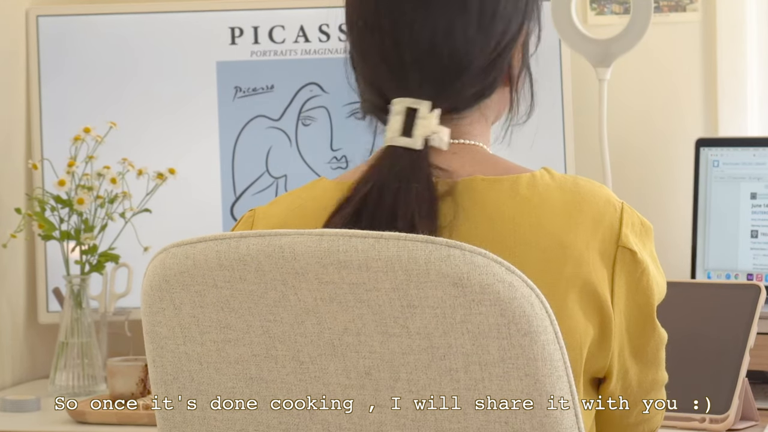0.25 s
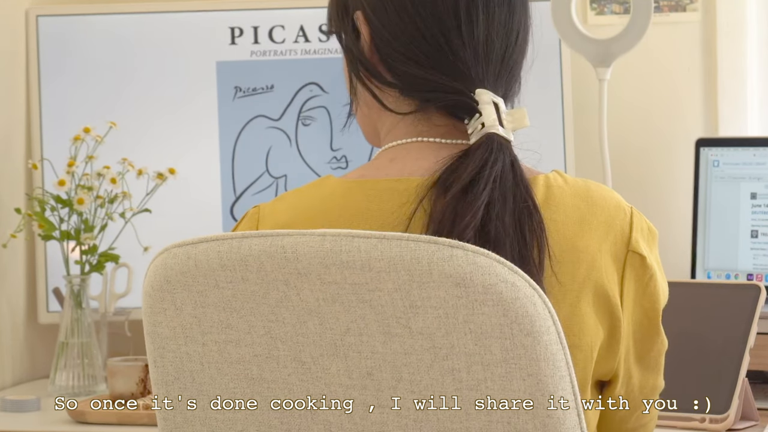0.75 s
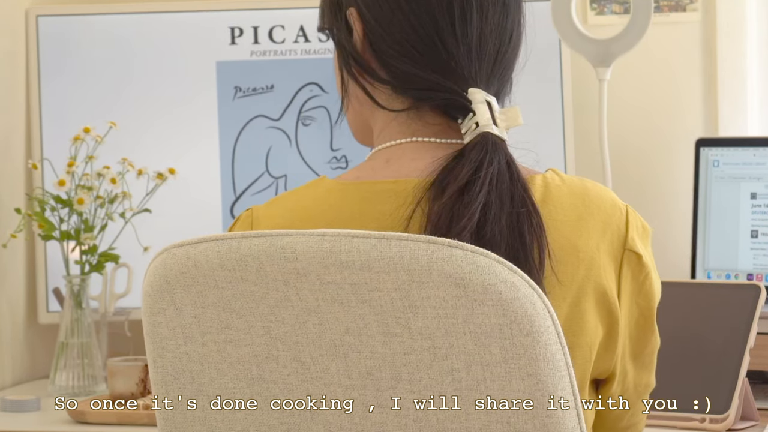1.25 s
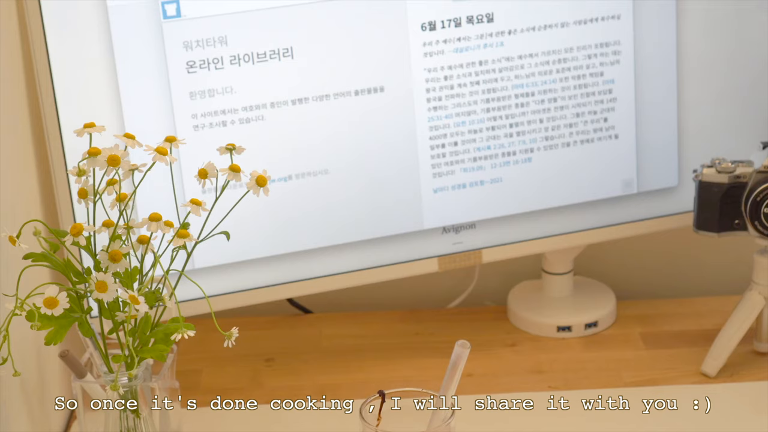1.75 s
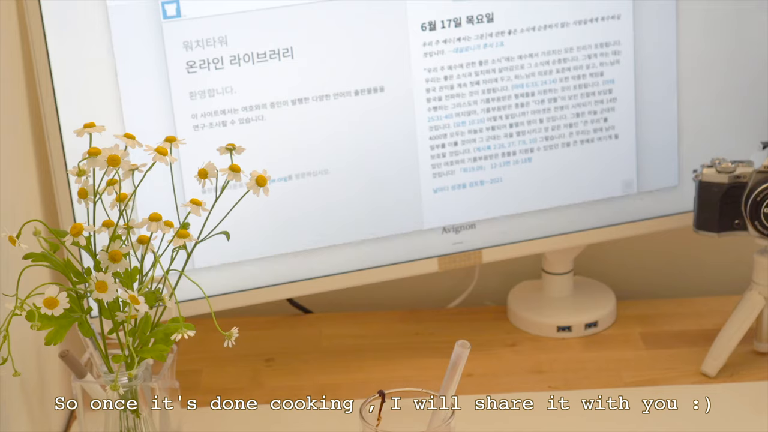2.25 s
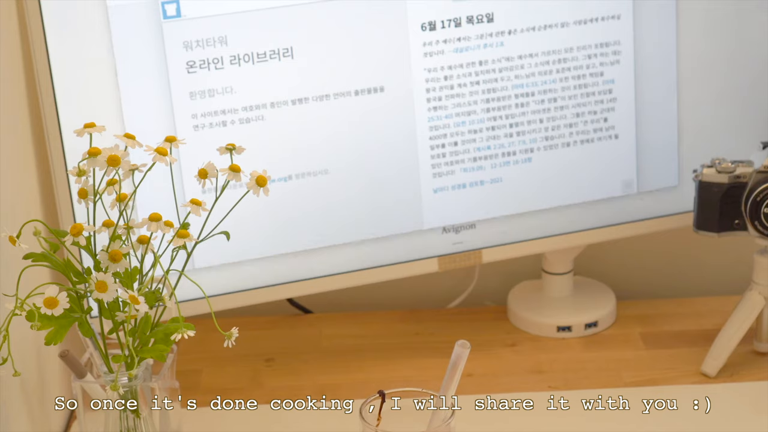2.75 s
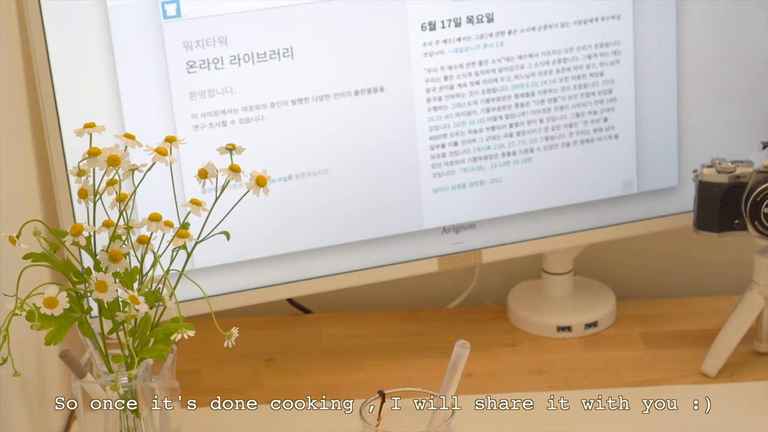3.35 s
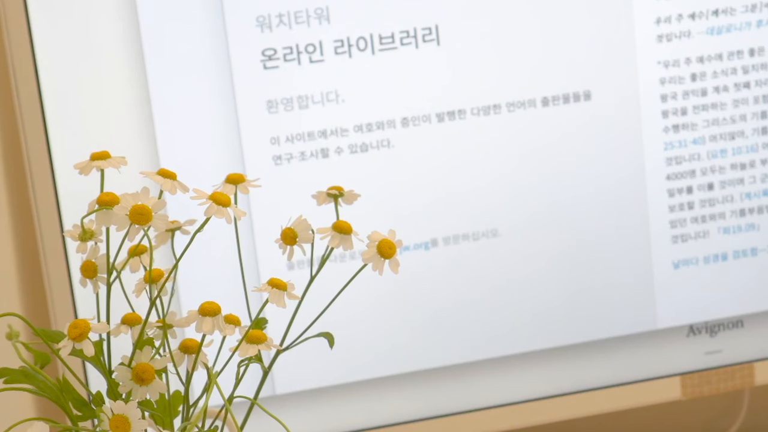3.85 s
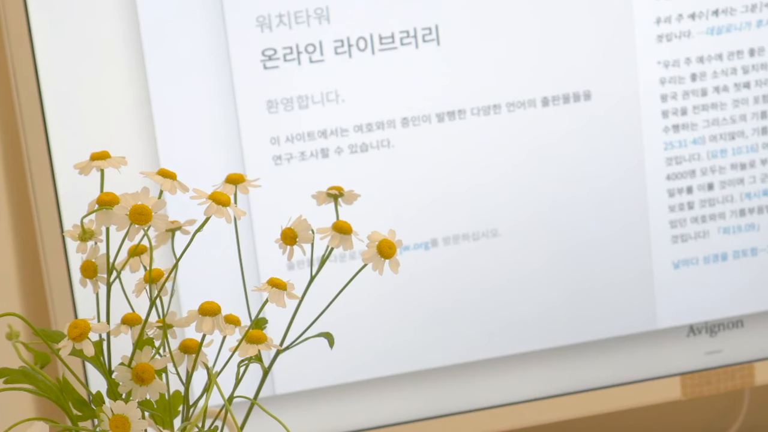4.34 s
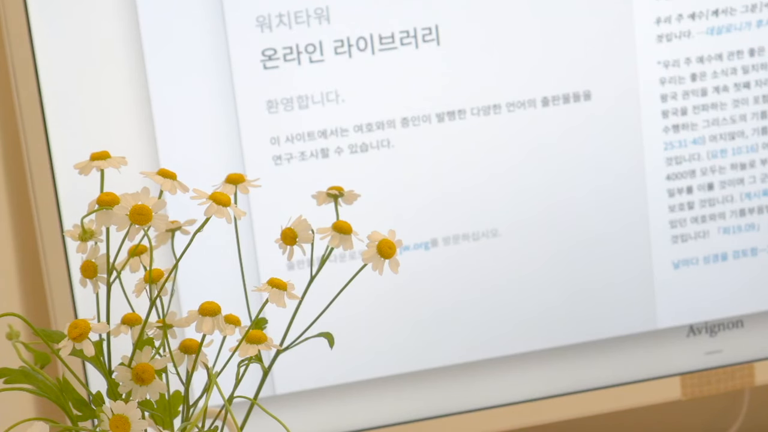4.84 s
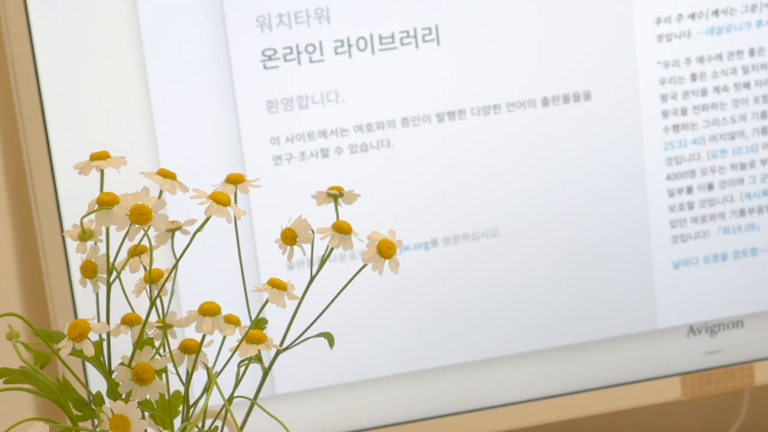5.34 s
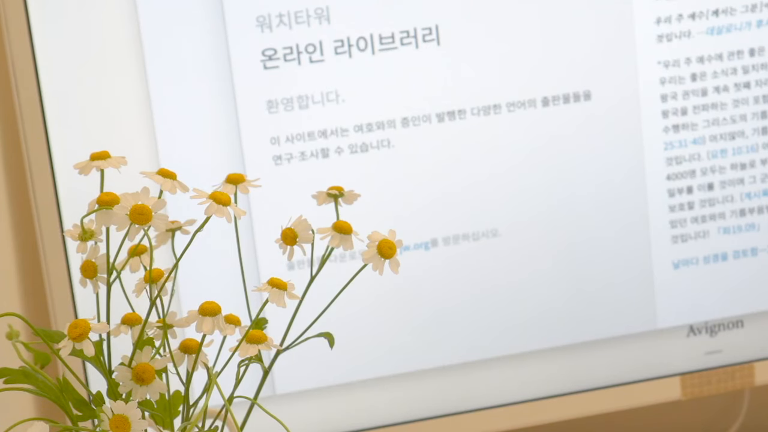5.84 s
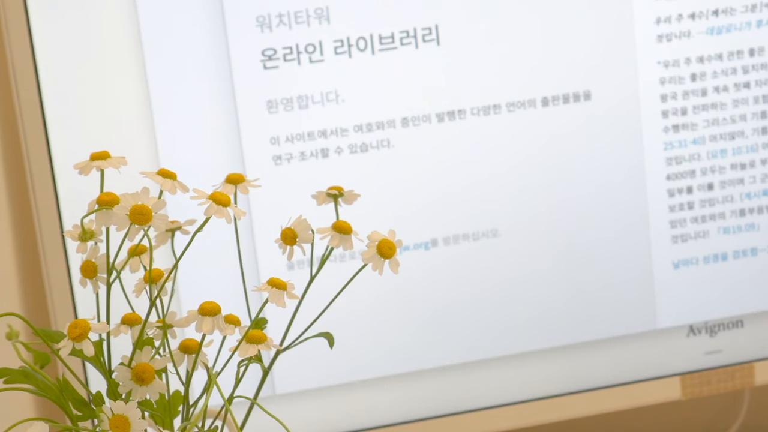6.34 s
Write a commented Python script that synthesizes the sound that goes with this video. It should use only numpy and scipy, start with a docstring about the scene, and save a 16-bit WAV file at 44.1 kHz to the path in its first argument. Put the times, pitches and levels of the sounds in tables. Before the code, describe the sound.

From the start, a glass straw stirs a drink in a small, echoing room, heard from a little way off. It scrapes and clinks brightly against the glass, with small liquid plops, over ventilation noise and a low rumble. The clinks are strongest in the first second, then lighter.

At about 1.5 seconds the sound switches suddenly to a quieter desk, where a fan hums and whirrs softly to the end. A computer mouse gives thin press-and-release clicks at about 2.1 and 3.1 seconds. A hand slides very faintly over the desk now and then. Something knocks on the wood with a slight rattle at 3.9 seconds, then louder at 4.6, followed by a small tap. The mouse clicks again at 5 seconds and between 6.1 and 6.3, joined by light fingertip taps. A last faint hand rub comes around 6.5 seconds.

```python
"""A small, echoing room, heard from a little way off. Behind a seated person a glass straw stirs a drink:
it scrapes and clinks on the glass, and pockets of air plop, over ventilation noise and a low rumble.
Then the scene switches to quieter work at a wooden desk. A fan hums and whirrs, a hand slides about,
the springy switch of a computer mouse clicks, and something knocks on the desk."""
import sys
import numpy as np
from scipy import signal
from scipy.fft import rfft, irfft
from scipy.io import wavfile

SR = 44100
rng = np.random.default_rng(int(sys.argv[2]) if len(sys.argv) > 2 else 0)


def dump(signal):
    """Clip the signal to [-1, 1] and save it as 16-bit WAV at the path in sys.argv[1]."""
    limited = np.clip(np.atleast_2d(signal).T, -1, 1)
    pcm = np.round(limited * 32767).astype(np.int16)
    wavfile.write(sys.argv[1], SR, pcm)


N = 290619


def amp(db):
    return 10 ** (np.asarray(db) / 20)


def unit_level(x):
    return x / np.sqrt(np.mean(x ** 2) + 1e-20)


def curve_at(points, hz):
    point_hz, value = np.transpose(points)
    return np.interp(np.log(hz + 1), np.log(point_hz), value)


def add(mix, start_s, sound):
    part = mix[..., max(round(start_s * SR), 0):][..., :sound.shape[-1]]
    part += sound[..., :part.shape[-1]]


def ring(tones, pitch=1, tilt_db=0, size=4096):
    """An object rings after one hit. Wider tones die sooner; tilt_db adds treble per octave."""
    hz = np.fft.rfftfreq(size, 1 / SR)
    power = 0
    for tone_hz, width_hz, db in tones:
        peak = amp(db + tilt_db * np.log2(tone_hz / tones[0][0]))
        power += (peak / (1 + (2 * (hz - tone_hz * pitch) / width_hz) ** 2)) ** 2
    # turn the spectrum into a sound that starts at once and then fades
    cepstrum = irfft(np.log(power + 1e-12) / 2)
    cepstrum[1:size // 2] *= 2
    cepstrum[size // 2 + 1:] = 0
    return unit_level(irfft(np.exp(rfft(cepstrum)))) / np.sqrt(size)


def stereo(spectra, likeness, hz):
    """Blends two noises into left and right: likeness 1 is identical, 0 is unrelated."""
    same = np.clip(curve_at(likeness, hz), -1, 1)
    mid = spectra[0] * np.sqrt((1 + same) / 2)
    side = spectra[1] * np.sqrt((1 - same) / 2)
    return np.array([mid + side, mid - side])


# first paths from the glass, the straight one shaded by the person: delay_s, left_db, right_db
GLASS_PATHS = [(0, -21, -22), (.0048, -10.5, -12), (.0062, -18, -15), (.0077, -8, -13), (0.011, -17, -12.5)]
# first paths from the desk: delay_s, left_db, right_db
DESK_PATHS = [(0, -23.5, -18), (.0017, -12, -15.5), (.0032, -23, -20), (.0058, -13, -9), (.0075, -27, -35),
              (0.018, -26, -39)]
# time the echo takes to fade by 60 dB: pitch_hz, fade_s
ECHO_FADE = [(150, 0.4), (500, 0.48), (1500, 0.48), (5500, 0.45), (9000, 0.38), (15000, 0.3)]
# how alike the echo is left and right: pitch_hz, likeness
ECHO_LIKENESS = [(100, 1), (500, 0.99), (1500, 0.75), (3000, 0.34), (6000, 0.1), (14000, 0.109)]
def room(sound, paths, tail_db, build_s, left_db):
    """Sound arrives by a few short paths, then as a wash of echoes whose treble dies first."""
    hz, t, noise = signal.stft(rng.standard_normal((2, SR // 2)), SR, nperseg=256)
    fade = amp(-60 * t[:, None] / curve_at(ECHO_FADE, hz))
    spectra = stereo(noise.transpose(0, 2, 1), ECHO_LIKENESS, hz) * fade
    tail = signal.istft(spectra.transpose(0, 2, 1), SR, nperseg=256)[1]
    tail *= np.clip(np.arange(tail.shape[1]) / SR / build_s, 0, 1) ** 2
    echo = amp(tail_db) * tail / np.linalg.norm(tail[0])
    for delay_s, left, right in paths:
        add(echo, delay_s, amp([[left], [right]]))
    balance = amp([[left_db], [-left_db]])
    return signal.fftconvolve(sound[None], echo * balance, axes=1)[:, :N]


# tone of the air around the drink: pitch_hz, relative_db
DRINK_AIR = [(20, -11), (40, -14), (58, 4.5), (85, -1.5), (130, -5), (200, -8.5), (350, -9), (600, -7),
             (900, -16), (2000, -16), (5000, -31), (16000, -37.5)]
# tone of the air around the desk: pitch_hz, relative_db
DESK_AIR = [(12, -46), (20, -13.5), (65, -7), (93, -9.5), (123, 1.5), (158, -9.5), (270, -5), (410, -9),
            (660, -14), (780, -16.5), (949, -15.5), (1610, -22), (2530, -23.5), (3340, -27.5), (16000, -35)]
# how alike the air is left and right: pitch_hz, likeness
AIR_LIKENESS = [(60, 1), (150, 0.9), (380, 0.72), (950, 0.22), (2380, 0.069), (5980, 0.15), (15000, 0.2)]
def air(colour, db):
    """Steady ventilation noise, with nearly the same bass in both ears."""
    hz = np.fft.rfftfreq(N, 1 / SR)
    noise = stereo(rfft(rng.standard_normal((2, N))), AIR_LIKENESS, hz)
    return amp(db) * unit_level(irfft(noise * amp(curve_at(colour, hz)), N))


# deep tones of the rumble: pitch_hz, width_hz, relative_db
RUMBLE_TONES = [(60, 12, 5.5), (78, 30, -2.5), (125, 60, -0.5), (196, 45, 0.5), (307, 110, -9),
                (460, 240, -8)]
def rumble(quiet_db=-48.5, loud_db=-45.5, swell_at_s=0.46, rise_s=0.067):
    """A dull drone, the same in both ears, that swells once and then holds."""
    swell = np.clip((np.arange(N) / SR - swell_at_s) / rise_s, 0, 1)
    drone = signal.oaconvolve(rng.standard_normal(N + SR), ring(RUMBLE_TONES, size=32768))
    return unit_level(drone[SR:SR + N]) * amp(quiet_db + (loud_db - quiet_db) * swell)


# ringing of the drinking glass: pitch_hz, width_hz, relative_db
GLASS_TONES = [(1147, 60, 5.5), (1480, 366, -1), (2100, 680, -6.5), (2843, 330, 1.5), (3212, 420, 3),
               (4327, 670, -1.5), (5600, 600, -2), (8700, 3050, -15), (13000, 3000, -25.5)]
# rasp of the straw pressed hard: pitch_hz, width_hz, relative_db
RASP_TONES = [(1440, 1800, -4), (4400, 3500, 3), (6120, 1200, 4), (8860, 3400, -10)]
# strokes along the glass: start_s, length_s, middle_db
SCRAPES = [(-.025, 0.04, -31), (0.162, 0.43, -42.5), (0.849, .125, -34.5), (.903, 0.014, -31),
           (1.105, 0.16, -51), (1.346, .17, -41)]
def scrapes(slips_per_s=800, spread_db=7, graze_db=-54, ends_db=-5.5, rasp_from_db=-23.5):
    """Tiny slips of the straw ring the glass. Each stroke presses hardest midway, where it rasps."""
    slips = (rng.random(N) < slips_per_s / SR) * rng.choice([-1, 1], N)
    slips = slips * amp(spread_db * np.minimum(rng.exponential(1, N), 3))
    pressure = np.full(N, amp(graze_db))  # between strokes the straw barely touches
    for start_s, length_s, db in SCRAPES:
        from_middle = abs(2 * (np.arange(N) / SR - start_s) / length_s - 1)
        pressure += (from_middle < 1) * amp(db + ends_db * from_middle)
    friction = unit_level(slips) * pressure
    rasp = signal.oaconvolve(friction * pressure / amp(rasp_from_db), ring(RASP_TONES))
    scrape = signal.oaconvolve(friction, ring(GLASS_TONES)) + rasp
    return room(scrape[:N], GLASS_PATHS, tail_db=-3, build_s=0.0049, left_db=-0.5)


# plops in the drink: start_s, level_db, pitch_hz
PLOPS = [(0, -5, 1194), (0.201, -13, 1180), (0.323, -10, 1188), (0.4594, -6.5, 1160), (.722, -19, 1206),
         (0.947, -13, 1477), (1.152, -3, 1590), (1.155, -7.5, 2030), (1.208, -14, 1660), (1.271, -14, 1350),
         (1.396, -9.5, 1176)]
def plops(glass_db=-13):
    """Pockets of air in the drink ring briefly and shake the glass."""
    out = np.zeros((2, N))
    for start_s, db, hz in PLOPS:
        width_hz = 150 * (hz / 1170) ** 3  # smaller pockets ring higher and die sooner
        plop = ring([(hz, width_hz, 0)]) + amp(glass_db) * ring(GLASS_TONES)
        add(out, start_s, amp(db) * room(plop, GLASS_PATHS, tail_db=-5.5, build_s=0.0053, left_db=-0.26))
    return out


# ringing of the straw: pitch_hz, width_hz, relative_db
STRAW_TONES = [(1393, 430, -34), (2140, 1400, -33), (2997, 1400, -23.5), (3786, 500, -19), (4290, 450, -16),
               (5569, 151, 2), (5800, 410, -7.5), (6310, 300, -19), (7550, 630, -18), (8280, 530, -16.5),
               (9270, 1300, -20.5), (9980, 450, -22), (11905, 540, -26), (13600, 700, -25.5),
               (15630, 800, -42)]
# hits on the glass: start_s, level_db, pitch_factor
CLINKS = [(0.0489, 15.5, 1.014), (0.074, 9.5, 1.04), (.105, 7.5, 1.01), (0.3556, 13.5, 1.01),
          (0.5641, 11, 1.005), (0.9914, 11, 0.997), (1.3439, 0, 0.986), (1.4012, 0, 1), (1.439, -6, .985)]
def clinks(ordinary_db=10.5, tilt_per_db=0.45):
    """The straw hits the glass, brighter when harder. It moves, so each clink echoes differently."""
    out = np.zeros((2, N))
    for start_s, db, pitch in CLINKS:
        clink = amp(db) * ring(STRAW_TONES, pitch, tilt_per_db * (db - ordinary_db))
        add(out, start_s, room(clink, GLASS_PATHS, tail_db=-1, build_s=0.0038, left_db=0.44))
    return out


# strokes of the hand: start_s, length_s, level_db
SLIDES = [(1.457, 0.058, -55), (3.395, 0.16, -65), (3.922, 0.11, -64), (4.25, 0.17, -66),
          (5.676, 0.033, -65), (5.737, 0.18, -65), (6.487, 0.12, -64)]
def hand_slides(centre_hz=4500, width_hz=7000):
    """A hand rubs over the desk in soft swells of hiss."""
    friction = np.zeros(N)
    for start_s, length_s, db in SLIDES:
        swell = np.hanning(round(length_s * SR))
        add(friction, start_s, amp(db) * swell * rng.standard_normal(SR)[:len(swell)])
    hiss = signal.oaconvolve(friction, ring([(centre_hz, width_hz, 0)]))[:N]
    return room(hiss, DESK_PATHS, tail_db=3.5, build_s=0.014, left_db=0)


# notes of the fan: pitch_hz, level_db
HUM_NOTES = [(70, -65), (118.4, -69), (233, -65.5), (349.9, -70), (672.9, -72)]
# ringing of its housing: pitch_hz, width_hz, relative_db
HOUSING_TONES = [(613, 73, -2), (1416, 97, -6), (2530, 330, -12), (7950, 3000, -43)]
def fan(waver_hz=4, whirr_db=-65):
    """A fan hums with faint, wavering notes while air rushes through its housing."""
    hz = np.fft.rfftfreq(N, 1 / SR)
    hum = np.zeros(N)
    for note_hz, db in HUM_NOTES:
        narrow_band = rfft(rng.standard_normal(N)) / (1 + ((hz - note_hz) / waver_hz) ** 2)
        hum += amp(db) * unit_level(irfft(narrow_band, N))
    whirr = signal.oaconvolve(rng.standard_normal((2, N)), ring(HOUSING_TONES)[None], axes=1)
    return hum + amp(whirr_db) * whirr[:, :N]


# snap of the mouse's switch: pitch_hz, width_hz, relative_db
SNAP_TONES = [(3700, 400, 9), (6060, 4000, 8.5), (7560, 390, 6.5), (8630, 390, 8.5), (9900, 1800, 2),
              (12700, 3500, 1.5), (14700, 1500, 1.5)]
def switch(ping, landing, tilt_db, travel_s, spring_lag_s=0.001, chatter_s=0.0021, chatter_db=-1):
    """The switch snaps, chatters and rings its spring; then the button lands on the shell."""
    t = np.arange(1024) / SR
    chatter = rng.standard_normal(len(t)) * np.exp(-t / chatter_s)
    contact = amp(chatter_db) * chatter / np.linalg.norm(chatter)
    contact[0] += 1  # the snap itself
    click = np.convolve(contact / np.linalg.norm(contact), ring(SNAP_TONES, tilt_db=tilt_db))
    add(click, spring_lag_s, ping)
    add(click, travel_s, landing)
    return click


def spring(hz, width_hz=600, overtone=2.06, overtone_db=-4):
    """The switch's flat spring pings with one higher tone on top."""
    return ring([(hz, width_hz, 0), (hz * overtone, width_hz, overtone_db)])


# ringing of the mouse's shell: pitch_hz, width_hz, relative_db
SHELL_TONES = [(268, 200, 0.5), (670, 680, -3.5), (1340, 430, -9), (2130, 2300, -11.5)]
def shell(hz, width_hz=550):
    """The hollow shell rings; one tone depends on where it is hit."""
    return ring(SHELL_TONES + [(hz, width_hz, 0)])


# clicks: press_s, release_s, press_db, release_db, spring_hz, press_landing_db
CLICKS = [(2.062, 2.1897, -11, -7, 4810, -6), (3.1236, 3.2054, -13, -8.5, 4870, -7.5),
          (4.9468, 5.048, -12.5, -8.5, 4900, -19), (6.0776, 6.301, -12.5, -13, 5290, -15)]
def mouse_clicks():
    """The button goes down with a thin snap and comes up with a brighter ring."""
    out = np.zeros((2, N))
    for press_s, release_s, press_db, release_db, hz, landing_db in CLICKS:
        loaded_ping = amp(-5) * spring(hz * 0.95)  # a pressed spring rings lower and weaker
        landing = amp(landing_db - press_db) * shell(hz=1620)
        press = switch(loaded_ping, landing, tilt_db=6.5, travel_s=0.0069)
        release = switch(amp(1) * spring(hz), amp(-10) * shell(hz=1350), tilt_db=1.5, travel_s=0.00193)
        for start_s, db, click in (press_s, press_db, press), (release_s, release_db, release):
            add(out, start_s, amp(db) * room(click, DESK_PATHS, tail_db=-5, build_s=0.0025, left_db=0.3))
    return out


# boom of the desk's board: pitch_hz, width_hz, relative_db
THUD_TONES = [(143, 70, -10), (230.4, 68, 5.5), (346, 350, -3), (596, 62, -0.5), (700, 230, -7.5)]
# clack of its surface: pitch_hz, width_hz, relative_db
CLACK_TONES = [(890, 730, 0), (1760, 1300, 8), (2470, 820, 5.5), (3550, 1900, 1.5), (5000, 2000, 1),
               (7600, 4600, -7.5), (12800, 4000, -15)]
# rattle of things on it: pitch_hz, width_hz, relative_db
RATTLE_TONES = [(1270, 190, -5), (1380, 180, 18.5), (2000, 790, 2)]
# knocks: start_s, thud_db, hardness_db_per_octave, clack_db, rattle_db
KNOCKS = [(3.794, -16.5, -9, -19.5, -29), (3.883, -3.5, -4.5, -14.5, -9), (4.5885, 0.5, -8, -6.5, -20),
          (4.5925, 2.5, 1.5, -8.5, -22), (4.599, 0, 1, -24, -15.5), (4.806, -18, 4, -27, -23)]
def desk_knocks(lowest_hz=95):
    """Each knock booms in the board, clacks on the surface and rattles what stands on it."""
    out = np.zeros((2, N))
    for start_s, thud_db, hardness, clack_db, rattle_db in KNOCKS:
        thud = amp(thud_db) * ring(THUD_TONES, tilt_db=hardness)
        knock = thud + amp(clack_db) * ring(CLACK_TONES) + amp(rattle_db) * ring(RATTLE_TONES)
        add(out, start_s, room(knock, DESK_PATHS, tail_db=-3, build_s=0.0016, left_db=0))
    # the knocks are heard without their deepest bass
    return signal.sosfilt(signal.butter(3, lowest_hz, "high", fs=SR, output="sos"), out)


# tick of a fingernail: pitch_hz, width_hz, relative_db
NAIL_TONES = [(5570, 3400, 0), (7860, 2500, -2)]
# taps on the mouse: start_s, level_db
TAPS = [(6.163, -18.5), (6.303, -14), (6.398, -25)]
def finger_taps(nail_db=0.5):
    """A fingertip taps the mouse's shell and the nail ticks."""
    out = np.zeros((2, N))
    tap = shell(hz=764) + amp(nail_db) * ring(NAIL_TONES)
    for start_s, db in TAPS:
        add(out, start_s, amp(db) * room(tap, DESK_PATHS, tail_db=-5, build_s=0.0025, left_db=0.3))
    return out


def scene(change_s=1.49, fade_s=0.0046):
    """The stirring suddenly gives way to quiet work at the desk."""
    drink = scrapes() + clinks() + plops() + rumble() + air(DRINK_AIR, db=-50)
    work = air(DESK_AIR, db=-52.5) + fan() + mouse_clicks() + finger_taps()
    work += desk_knocks() + hand_slides()
    drink_share = np.clip((change_s - np.arange(N) / SR) / fade_s + 0.5, 0, 1)
    return drink_share * drink + (1 - drink_share) * work


def record(dry, highest_hz=16000):
    """Takes away the very highest treble."""
    low_pass = signal.firwin(511, highest_hz, window=("kaiser", 9), fs=SR)
    return signal.oaconvolve(dry, low_pass[None], "same")


dry = scene()
out = record(dry)
dump(out)
```